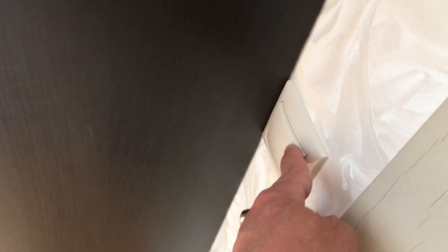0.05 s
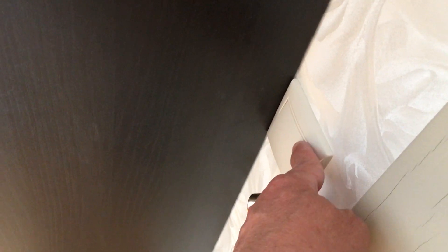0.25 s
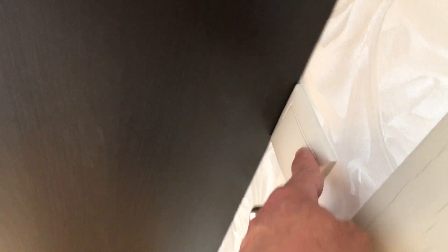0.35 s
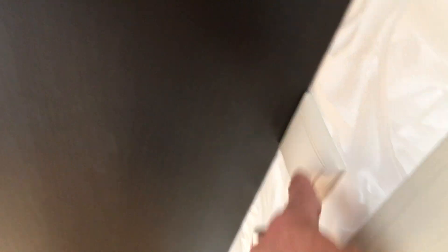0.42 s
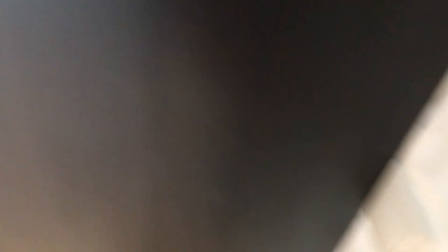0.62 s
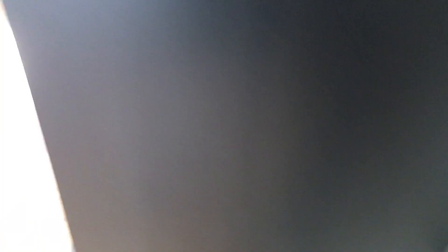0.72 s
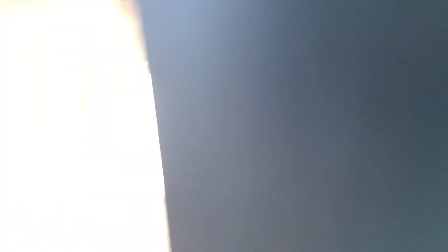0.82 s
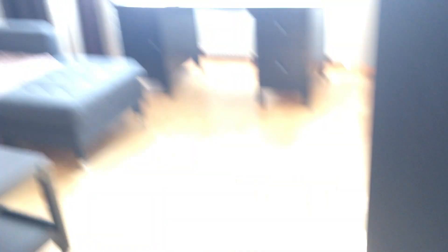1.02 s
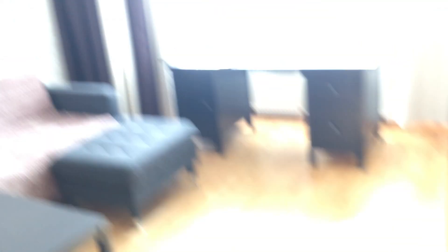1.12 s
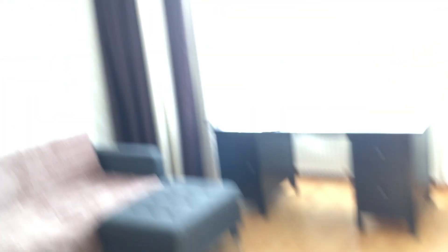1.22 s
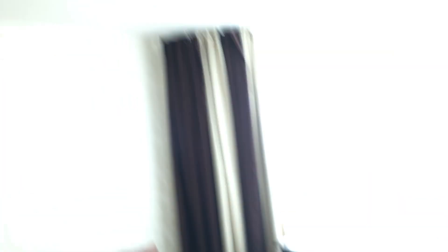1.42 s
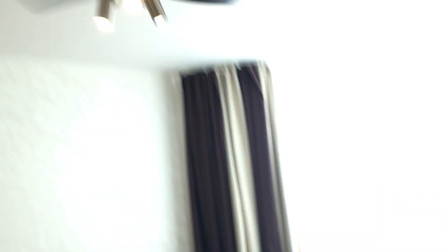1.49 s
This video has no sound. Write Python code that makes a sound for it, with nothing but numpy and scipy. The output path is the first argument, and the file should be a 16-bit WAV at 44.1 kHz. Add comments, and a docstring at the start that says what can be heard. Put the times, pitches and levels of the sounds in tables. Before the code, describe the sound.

One crisp click of a plastic light switch in a quiet room, then soft cloth swishing.

```python
"""A low rumble and a wavering hum fill a furnished room. At 0.2 s a plastic rocker switch on the wall
ticks faintly, snaps over and hits its stop 3 ms later. Each impact excites the damped modes of the
plate, and the room answers with reflections and reverberation. The fingertip lifts with a tiny tap.
Then sliding friction makes cloth rustle softly as the hand withdraws, and swish once near 1 s."""
import sys
import numpy as np
from scipy import signal
from scipy.fft import rfft, irfft
from scipy.io import wavfile

SR = 44100
rng = np.random.default_rng(int(sys.argv[2]) if len(sys.argv) > 2 else 0)


def wav_out(sig):
    """Save sig, one row per channel (or a flat mono array), as 16-bit PCM at SR to the path in sys.argv[1]."""
    wavfile.write(sys.argv[1], SR, np.round(np.clip(np.atleast_2d(sig).T, -1, 1) * 32767).astype(np.int16))


N = 68355
T = np.arange(N) / SR
FREQS = np.fft.rfftfreq(N, 1 / SR)
CONTACT_S = 0.00044  # rise time of an impact


def amp(db):
    """Amplitude ratio of a level in decibels."""
    return 10 ** (np.asarray(db) / 20)


def unit(x):
    """Normalisation to rms 1."""
    return x / np.sqrt(np.mean(x ** 2) + 1e-20)


def curve_at(points, hz):
    """Interpolation along a logarithmic frequency axis."""
    f, value = np.transpose(points)
    return np.interp(np.log(hz + 1), np.log(f + 1), value)


def noise(spectrum):
    """Spectral shaping: white noise filtered to the given spectrum, at rms 1."""
    return unit(irfft(rfft(rng.standard_normal(N)) * amp(curve_at(spectrum, FREQS)), N))


def drift(rate_hz):
    """Random fluctuation: low-pass noise of rms 1."""
    return unit(irfft(rfft(rng.standard_normal(N)) * np.exp(-(FREQS / rate_hz) ** 2), N))


# room air: f/Hz, relative spectral level/dB
AIR_SPECTRUM = [(20, -18.5), (35, -13.5), (55, -2), (85, -5), (135, 0), (200, -6.5), (300, -15), (600, -21),
                (1400, -23), (3000, -26.5), (7000, -29.5), (16000, -29.5)]

def background():
    """Ambient noise, rising over the first 0.4 s, and a hum that wavers by random modulation."""
    air_db = -63 - 5.5 * np.clip(1 - T / 0.4, 0, 1)
    air = amp(air_db) * noise(AIR_SPECTRUM)
    hum_hz, depth = 49.5, 0.83
    phase = 2 * np.pi * hum_hz * T
    hum = (1 + depth * drift(6.4)) * np.sin(phase) + depth * drift(9.1) * np.cos(phase)
    return air + amp(-66) * unit(hum)


def impact(start, t60):
    """Damping: after a linear rise during contact, the amplitude falls 60 dB in t60 seconds."""
    age = np.maximum(T - start, 0)
    return np.minimum(age / CONTACT_S, 1) * amp(-60 * age / t60)


def pulse(at, hz, db, tau):
    """Time-bandwidth reciprocity: the shorter the pulse, the wider its band around hz."""
    return amp(db) * np.exp(-abs(T - at) / tau) * np.cos(2 * np.pi * hz * (T - at))


# four light touches, the snap, the stop: t/s, ring level/dB, ring low-cut f/Hz, relative crack level/dB
ROCKER_IMPACTS = [(.2008, -43, 200, -38), (.2128, -45, 400, -42.5), (.2158, -44, 400, -48),
                  (.2212, -34.5, 497, -39.5), (0.2243, 2.5, 698, 3), (0.2275, 1.5, 477, -2)]
# modes of the plate and its box: f/Hz, relative level/dB, T60/s
PLATE_MODES = [(696, -13.5, .034), (1003, -19.5, .03), (1190, -37, 0.022), (1347, -22, .038),
               (1612, -24.5, .028), (1682, -30.5, .035), (1840, -31, 0.019), (2760, -39.5, .026),
               (3868, -28, .032), (4255, -29.5, 0.045), (6015, -33.5, 0.046), (7870, -37, .028),
               (10480, -34, 0.014)]
# crack of hard plastic: f/Hz, relative spectral level/dB
CRACK_SPECTRUM = [(200, -26), (1500, -6), (2200, -6), (3000, -1.5), (4500, 0), (5500, -2.5), (9000, 1),
                  (12500, 1), (14500, 1.5), (16000, -5.5)]
# bright tick of the contact closing: f/Hz, level/dB, time constant/s
CONTACT_TICK = (12800, -7, .00031)
# dull thud of the wall box taking the stop: f/Hz, level/dB, time constant/s
BOX_THUD = (592, -19.5, 0.00092)

def switch():
    """Impact excitation: each blow sets the plate's modes ringing and radiates a broadband crack."""
    snap_s, stop_s, crack_lead_s = 0.2247, 0.2275, 0.00076
    blows = np.zeros(N)
    for at, ring_db, cut_hz, crack_db in ROCKER_IMPACTS:
        ring = sum(amp(db) * impact(at - CONTACT_S, t60) * np.cos(2 * np.pi * hz * (T - at))
                   for hz, db, t60 in PLATE_MODES)
        low_cut = FREQS ** 2 / (FREQS ** 2 + cut_hz ** 2)
        blows += amp(ring_db) * irfft(rfft(ring) * low_cut, N)
        blows += amp(crack_db - 18) * impact(at - crack_lead_s, t60=0.027) * noise(CRACK_SPECTRUM)
    return blows + pulse(snap_s, *CONTACT_TICK) + pulse(stop_s, *BOX_THUD)


# reflections from near surfaces: delay t/s, relative level/dB
EARLY_REFLECTIONS = [(.006, -19), (.0245, -23.5), (.028, -26.5)]
# reverberation time: f/Hz, T60/s
REVERB_TIMES = [(150, 0.83), (650, 0.38), (1500, 0.51), (3000, 0.45), (7000, 0.43), (12000, 0.37),
                (16000, 0.43)]
# strength of the reverberant field: f/Hz, relative level/dB
REVERB_LEVELS = [(150, -12.5), (400, -15), (610, -6), (720, -14), (1000, -15), (1500, -10.5), (1950, -19.5),
                 (2700, -8.5), (4000, -15.5), (6100, -10), (8000, -14), (11000, -12), (12700, -16.5),
                 (15000, -9)]

def room(source):
    """Reverberation: discrete reflections and a diffuse tail that lasts longest in the bass."""
    hz, t, bands = signal.stft(rng.choice([-1., 1.], SR), SR, nperseg=256)
    t60 = curve_at(REVERB_TIMES, hz)[:, None]
    decay = amp(curve_at(REVERB_LEVELS, hz)[:, None] - 60 * t / t60)
    energy_norm = np.sqrt(2 * np.log(1000) / (t60 * SR))  # makes band energy independent of T60
    response = signal.istft(bands * decay * energy_norm, SR, nperseg=256)[1]
    tail_delay_s = 0.0074
    tail = np.interp(T - tail_delay_s, T, signal.fftconvolve(source, response)[:N])
    return tail + sum(amp(db) * np.roll(source, round(delay * SR)) for delay, db in EARLY_REFLECTIONS)


# tap of the fingertip: f/Hz, relative spectral level/dB
FINGER_SPECTRUM = [(150, -16), (500, 17.5), (2000, 2), (4000, 2), (7500, 1), (11000, -31), (16000, -23)]
# its decay: level/dB, T60/s
FINGER_TAP = (-55, 0.097)

def finger_lift():
    """Release transient: the fingertip leaves the rocker with a tiny damped tap."""
    db, t60 = FINGER_TAP
    return amp(db) * impact(start=0.437, t60=t60) * noise(FINGER_SPECTRUM)


def friction(peak_s, rise_s, fall_s, db, spectrum, grain_db):
    """Friction noise: fibre hiss grows as the square of the sliding speed, a lopsided Gaussian in time."""
    width = np.where(T < peak_s, rise_s, fall_s)
    speed = np.exp(-0.5 * ((T - peak_s) / width) ** 2)
    return amp(db + grain_db * drift(rate_hz=250)) * speed ** 2 * noise(spectrum)


# rubs of the sleeve: peak t/s, speed rise width/s, speed fall width/s, level/dB
SLEEVE_RUBS = [(.49, 0.089, .05, -64.5), (0.621, 0.091, 0.098, -57.5), (.76, 0.076, 0.12, -62)]
# their hiss: f/Hz, relative spectral level/dB
SLEEVE_SPECTRUM = [(200, 4.5), (500, -1), (1400, 2), (2000, -3), (2380, 8), (2650, 0.5), (3000, 1.5),
                   (4800, -8.5), (5800, -2.5), (8000, -8), (10500, -6.5), (12500, -3.5), (16000, -6)]

def sleeve():
    """Sliding friction: the sleeve rubs lightly three times as the hand withdraws."""
    return sum(friction(*rub, SLEEVE_SPECTRUM, grain_db=0.4) for rub in SLEEVE_RUBS)


# strokes of the cloth: speed rise width/s, speed fall width/s, level/dB
SWISH_STROKE = (0.12, 0.13, -47)
BRUSH_STROKE = (0.23, 0.17, -59)
# their hiss: f/Hz, relative spectral level/dB
SWISH_SPECTRUM = [(500, -28), (2000, -14), (3600, -11), (4400, -1.5), (4950, -7.5), (5800, 1), (6900, -2),
                  (7500, -3.5), (8050, -6), (9000, 0), (10200, -10), (11900, -3.5), (13500, -7.5),
                  (16000, -10)]
BRUSH_SPECTRUM = [(120, 4), (250, 2.5), (550, -6.5), (1400, 1.5), (2200, 1), (4000, -2), (9000, -20),
                  (16000, -37)]

def cloth_swish():
    """Sliding friction: one sweep of cloth gives a bright swish over a duller, longer brushing."""
    swish_s, brush_s = 0.985, 1.01
    swish = friction(swish_s, *SWISH_STROKE, SWISH_SPECTRUM, grain_db=0.2)
    brush = friction(brush_s, *BRUSH_STROKE, BRUSH_SPECTRUM, grain_db=-0.1)
    return swish + brush


def scene():
    """Superposition: the sources add in one channel, and only the switch excites the room."""
    click = switch()
    return (click + room(click) + finger_lift() + sleeve() + cloth_swish() + background())[None]


def record(dry):
    """Band limiting: a gentle bass roll-off and a steep treble edge."""
    low_hz, high_hz = 39.93, 15850
    high_pass = signal.butter(2, low_hz, "high", fs=SR, output="sos")
    low_pass = signal.firwin(511, high_hz, window=("kaiser", 9), fs=SR)
    return signal.oaconvolve(signal.sosfilt(high_pass, dry), low_pass[None], "same")


dry = scene()
out = record(dry)
wav_out(out)
```